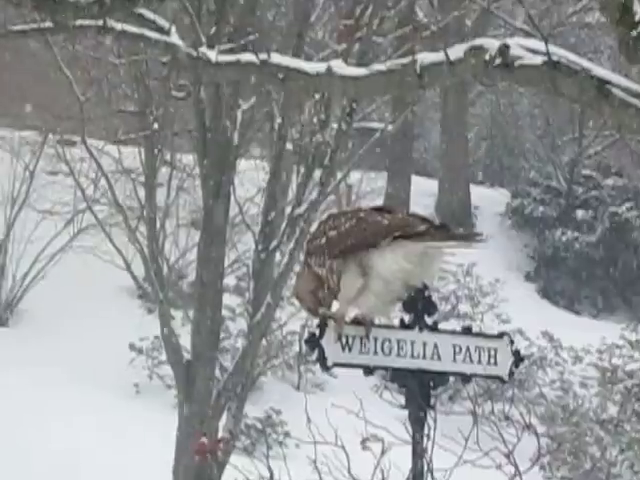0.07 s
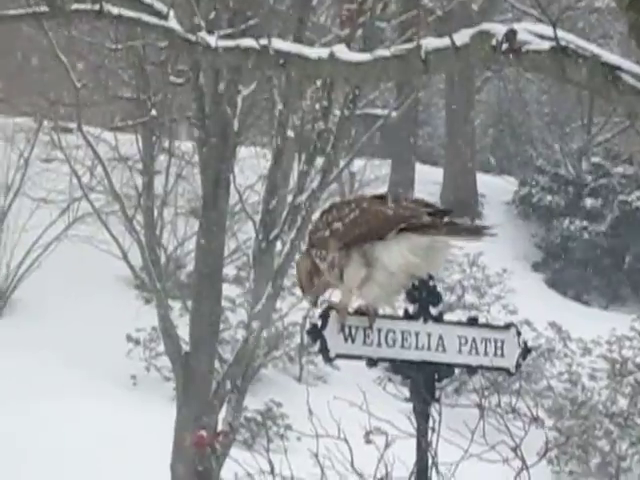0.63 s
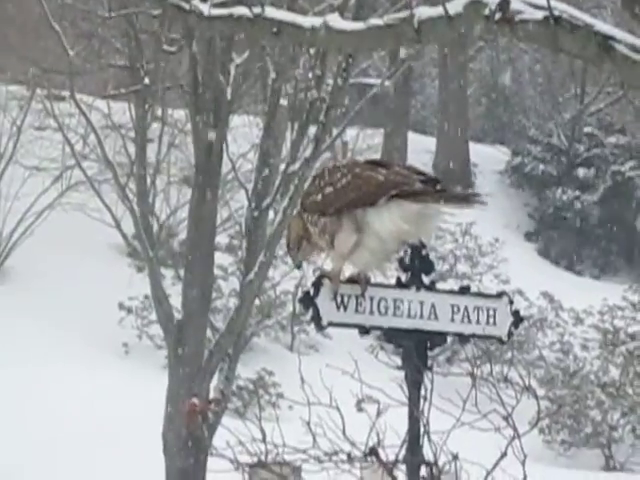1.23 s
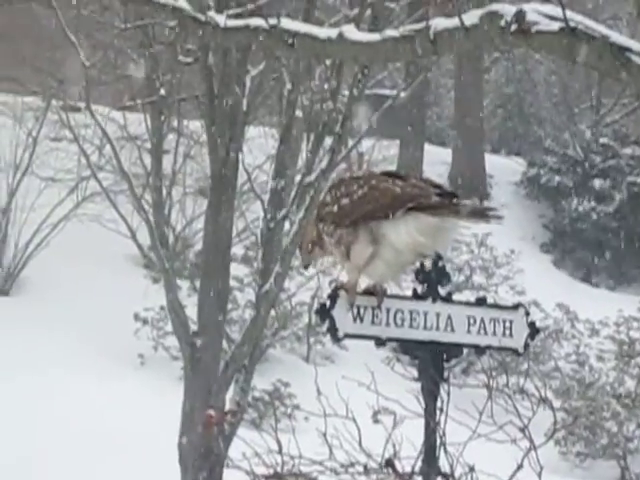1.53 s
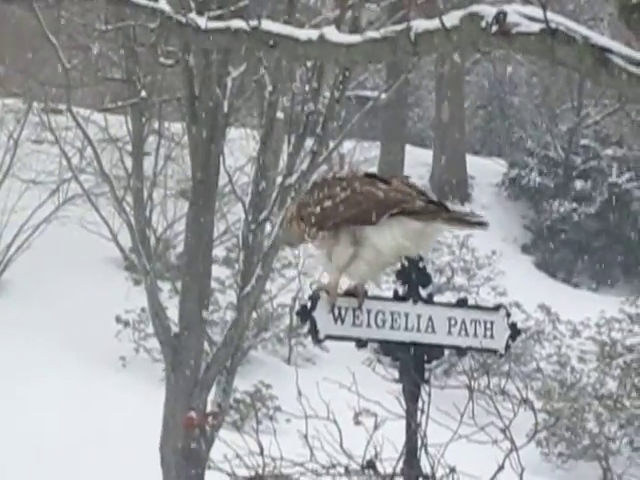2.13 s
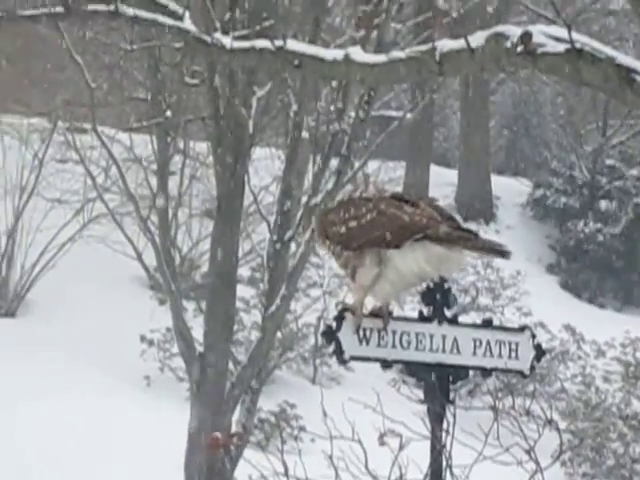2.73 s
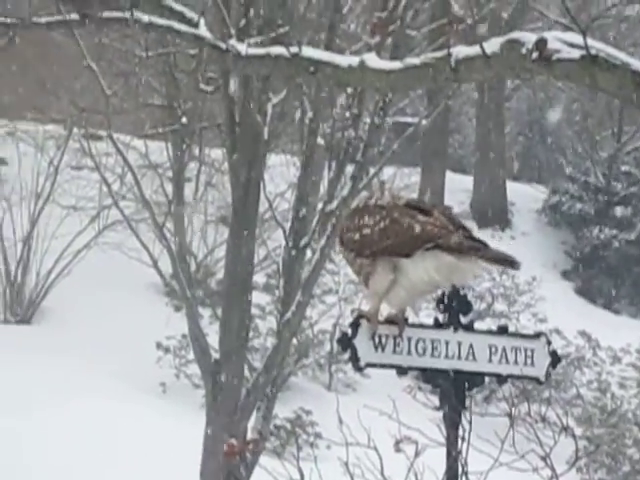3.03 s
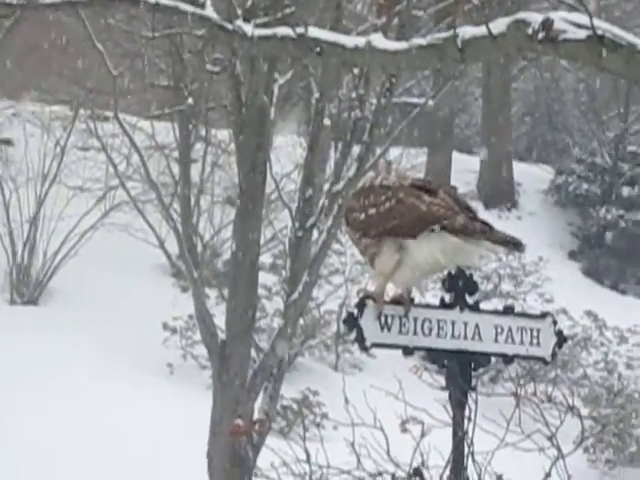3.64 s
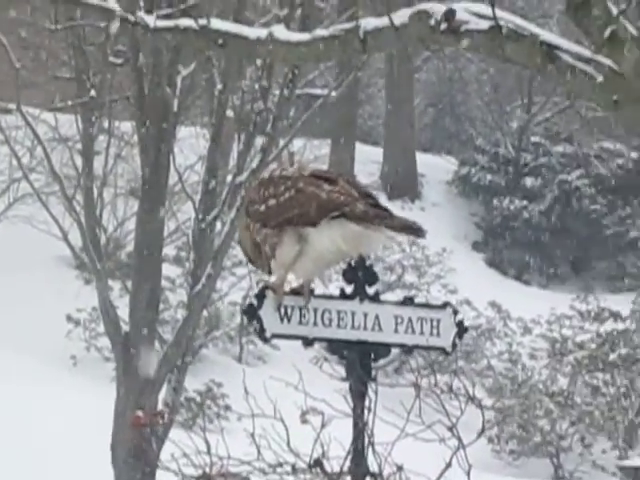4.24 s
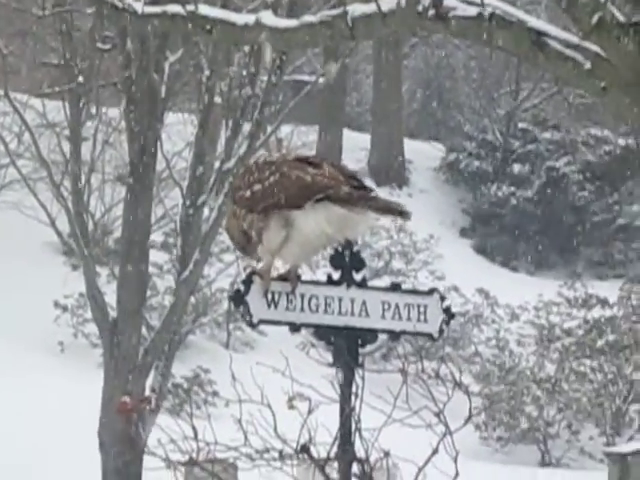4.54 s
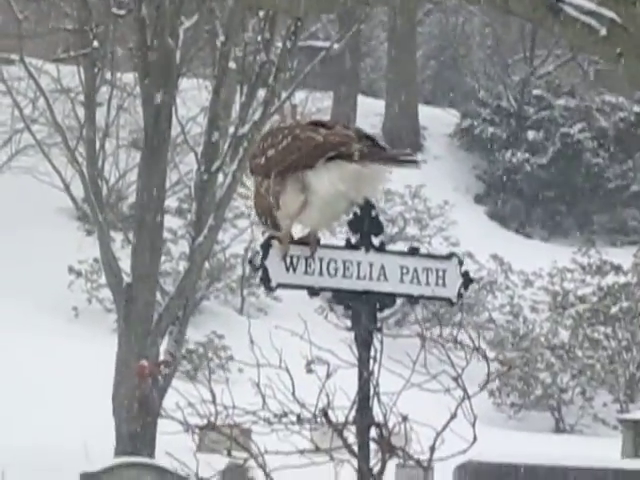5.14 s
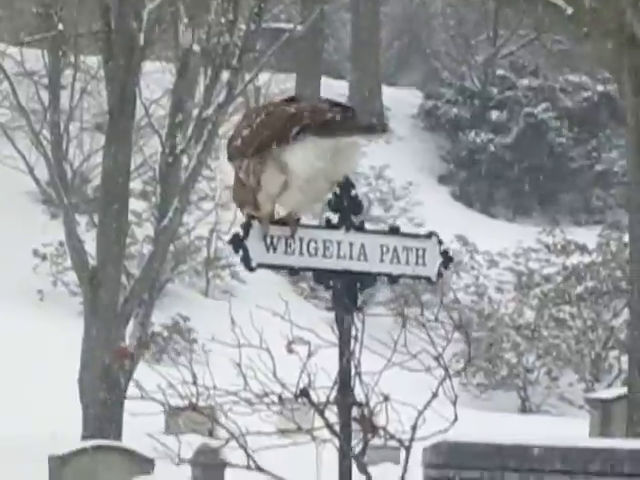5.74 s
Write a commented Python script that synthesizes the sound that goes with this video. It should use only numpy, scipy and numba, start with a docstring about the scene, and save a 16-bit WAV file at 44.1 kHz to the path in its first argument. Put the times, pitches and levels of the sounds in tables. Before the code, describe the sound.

Five loud, hoarse screams from a nearby jay in a snowy wood, with faint whistles, clicks and a low background rumble.

```python
"""A jay screams five times, close by in a snowy wood. Each scream starts clear, then breaks into a rasp
as the two sides of its voice organ (the syrinx) fall out of step. A small bird whistles far off, and a
few clicks, chinks and rustles sound nearby, over distant traffic, a low rumble and an engine's hum.
An automatic volume control turns everything down under each scream."""
import sys
import numpy as np
from scipy import signal
from scipy.fft import rfft, irfft
from scipy.io import wavfile
from scipy.ndimage import uniform_filter1d, minimum_filter1d
from numba import njit

SR = 44100
rng = np.random.default_rng(int(sys.argv[2]) if len(sys.argv) > 2 else 0)


def generate_wav(sig):
    """Save sig (samples, or channels by samples) to the path in sys.argv[1] as 16-bit PCM at SR."""
    pcm = np.round(np.clip(np.atleast_2d(sig).T, -1, 1) * 32767).astype(np.int16)
    wavfile.write(sys.argv[1], SR, pcm)


N = 263277
T = np.arange(N) / SR
DROOP_S = 0.04  # how quickly a scream gives way at its end


def undb(db):
    """Turn decibels into a gain."""
    return 10 ** (np.asarray(db) / 20)


def unit(x):
    """Scale a signal to an average power of 1."""
    return x / np.sqrt(np.mean(x ** 2))


def phase_of(hz):
    """Add up a changing pitch into the angle of a wave."""
    return 2 * np.pi * np.cumsum(hz) / SR


def curves(rows, t):
    """Join a table's rows by straight lines; the first column is time."""
    times, *columns = np.transpose(rows)
    return [np.interp(t, times, column) for column in columns]


def colour_db(points, hz):
    """Read a colour, a list of (frequency [Hz], level [dB]), at the given frequencies."""
    knots, db = np.transpose(points)
    return np.interp(np.log(hz), np.log(knots), db)


def wander(rate_hz, size=N):
    """Smooth random motion of typical size 1, up to about rate_hz."""
    hz = np.fft.rfftfreq(size, 1 / SR)
    return unit(irfft(rfft(rng.standard_normal(size)) / (1 + (hz / rate_hz) ** 4), size))


def coloured(points, size=N):
    """Noise of power 1 with the given colour."""
    gain = undb(colour_db(points, np.fft.rfftfreq(size, 1 / SR) + 1))
    return unit(irfft(rfft(rng.standard_normal(size)) * gain, size))


def resonate(x, hz, width_hz):
    """Let through a band of sound around hz."""
    return signal.lfilter(*signal.iirpeak(hz, hz / width_hz, fs=SR), x)


def traffic(level_db=-42.5):
    """Distant traffic: a dull, almost steady wash of noise."""
    # colour of the traffic, inner rows only are used: (frequency [Hz], level [dB])
    colour = [(20, -15), (50, 3), (75, -4), (150, -1), (300, -1.5), (550, -3), (900, 2), (1400, -3.5),
              (2600, -7.5), (4400, -13), (5500, -21.5), (6800, -29.5), (9000, -35.5), (14000, -75)]
    return coloured([(3.9, -12)] + list(colour[1:-1])) * undb(level_db + .5 * wander(0.9))


def rumble():
    """Deep noise around 35 Hz that slowly sinks and rises."""
    # strength of the rumble: (time [s], level [dB])
    levels = [(0, -52), (3, -57.5), (3.9, -51), (5.97, -57.5)]
    level_db, = curves(levels, T)
    colour = [(10, -19), (24, -10.5), (35, 9.5), (48, -12.5), (90, -36.0), (400, -90.5)]
    return coloured(colour) * undb(level_db)


def engine_hum(drift=0.003985, flutter_db=3):
    """An engine hums three low tones that drift in pitch together."""
    # tones of the hum: (frequency [Hz], level before the swell [dB])
    tones = [(157, -58.5), (313, -61), (469, -61)]
    # its slow swell: (time [s], gain [dB])
    swell = [(0, -7), (2.7, -3), (4.6, 3.5), (5.97, -4)]
    swell_db, = curves(swell, T)
    phase_per_hz = phase_of(1 + drift * wander(2.1))
    hum = sum(undb(db + flutter_db * wander(3.0)) * np.sin(hz * phase_per_hz) for hz, db in tones)
    return np.sqrt(2) * hum * undb(swell_db)


def woods(x, branches_s=.3, trunks_s=0.82, slope_delay_s=0.53, slope_db=-13):
    """Close branches echo briefly and brightly, trunks longer and duller, and a far slope once more."""
    t = T[:SR]
    branches = coloured([(1500, -12.5), (3300, 0), (7000, 8), (9000, 2), (13000, -19)], SR)
    branches *= undb(-60 * t / branches_s) * np.clip(t / .012, 0, 1)
    trunks = undb(-60 * t / trunks_s + wander(60, SR)) * np.clip(t / 0.098, 0, 1)
    trunks *= coloured([(1000, -31), (2500, -0.5), (3300, -1), (6500, -7), (8500, -12),
                        (12000, -43.5)], SR)
    slope = coloured([(1000, 12), (3300, 0.5), (5000, -29.0), (8000, -37)], SR)
    slope *= np.exp(-((t - slope_delay_s) / 0.025) ** 2)
    echoes = unit(branches) + unit(trunks) + undb(slope_db) * unit(slope)
    return signal.fftconvolve(x, echoes / np.sqrt(SR))[:N]


def far_bird(count=6, first_s=.084, every_s=.1162, gain_db=-28.5):
    """A small bird whistles a quick, even run of pure upward slides."""
    # one whistle: (time from its top [s], pitch [Hz], relative level [dB])
    slide = [(-.055, 1690, -16.5), (-.035, 1950, -21), (-.02, 2270, -12), (-.01, 2950, -9), (0, 3040, -7),
             (.009, 3000, -18), (0.02, 2800, -16)]
    out = np.zeros(N)
    for top in first_s + every_s * np.arange(count):
        during = (T > top + slide[0][0]) & (T < top + slide[-1][0])
        hz, shape_db = curves(slide, T[during] - top)
        out[during] += np.sqrt(2) * undb(gain_db + shape_db) * np.sin(phase_of(hz))
    return out


def rustles():
    """Soft rustles: short swells of grainy noise."""
    # (middle time [s], spread in time [s], level [dB], centre frequency [Hz])
    swells = [(0.354, 0.055, -43, 2770), (2.379, 0.013, -41, 2190)]
    out = np.zeros(N)
    for middle, spread, db, hz in swells:
        grains = rng.standard_normal(N) * undb(1.2 * wander(300))
        rustle = unit(resonate(resonate(grains, hz, hz * .5), hz, hz * 0.91))
        out += undb(db) * np.exp(-((T - middle) / spread) ** 2 / 2) * rustle
    return out


def chinks(fade_s=0.014, spread_octaves=0.83, size=4096):
    """Small metallic chinks: each contact rings briefly with several wavering tones."""
    # contacts: (time [s], level [dB], brightest frequency [Hz])
    contacts = [(2.066, -29.5, 4300), (2.09, -34, 4600), (2.109, -35.5, 4500), (2.519, -30.5, 4320),
                (2.534, -32, 4560), (2.557, -39, 4770), (2.584, -38, 4900), (3.941, -36, 4900)]
    # the tones they ring with: (frequency [Hz], waver [Hz], relative level [dB])
    tones = [(1957, 23, 9.5), (3490, 120, -4.5), (3730, 20, -8.5), (4420, 160, -8.5), (4675, 100, -1),
             (5290, 85, -9)]
    envelope = np.exp(-T[:size] / fade_s) * np.clip(T[:size] / 0.00039, 0, 1)
    out = np.zeros(N)
    for start, db, brightest_hz in contacts:
        ring = np.zeros(size)
        for hz, waver_hz, tone_db in tones:
            gain = undb(tone_db) * np.exp(-(np.log2(hz / brightest_hz) / spread_octaves) ** 2)
            ring += gain * np.sin(phase_of(hz + waver_hz * wander(390, size)) + rng.uniform(0, 2 * np.pi))
        out[int(start * SR):][:size] += undb(db) * envelope * unit(ring)
    return out


def clicks(fade_s=0.00087, width_share=0.46, top_hz=9500, size=4096):
    """Dry clicks: one sharp snap each, with a little splintering after it."""
    # snaps: (time [s], peak level [dB], centre frequency [Hz])
    snaps = [(.151, -36, 6500), (0.323, -16, 1792), (0.3313, -22, 1840), (0.3864, -20.5, 4500),
             (.575, -23.5, 4360), (2.256, -24, 4070), (2.454, -36, 6500), (4.139, -21.5, 4600)]
    out = np.zeros(N)
    for start, db, hz in snaps:
        snap = signal.unit_impulse(size) + np.exp(-T[:size] / fade_s) * rng.standard_normal(size) / 2
        width_hz = width_share * hz
        click = resonate(resonate(snap, hz, width_hz), hz, 1.6 * width_hz)
        click = signal.sosfilt(signal.butter(2, top_hz, fs=SR, output="sos"), click)
        out[int(start * SR):][:size] += undb(db) * click / np.abs(click).max()
    return out


def scream_pitch(t, start, slip, split, end, top_hz, sag_hz_per_s, lift_hz, slip_hz=59.06, droop=.068):
    """The pitch sags, slips a step, can lift with a fresh push, and droops as the air runs out."""
    held = top_hz - sag_hz_per_s * (t - start) - slip_hz * (1 + np.tanh((t - slip) / 0.015)) / 2
    lift = lift_hz * np.exp(-((t - split - 0.0268) / 0.0394) ** 2)
    return (held + lift) * (1 - droop * np.exp(np.minimum(t - end, 0) / DROOP_S))


def scream_levels(age, left, main_db, overtones_db, opens_s=0.02, closes_s=0.081, shut_db=21.5):
    """Relative levels of the tones at 2, 3 and 4 times the pitch; a shut bill muffles the last."""
    # the main tone surges as the voices lock, at the third's cost, then slowly weakens
    surge = np.exp(-((age - 0.039) / 0.01) ** 2)
    second_db = -19.5 + main_db + 6.5 * surge - 3 * age
    third_db = -32.5 - 7 * surge
    bill_open = (1 - np.exp(-age / opens_s)) * (1 - np.exp(-left / closes_s))
    fourth_db = -27 + overtones_db - shut_db * (1 - bill_open)
    return second_db, third_db, fourth_db


def scream(start, slip, split, end, top_hz, sag_hz_per_s, lift_hz, scoop_s, main_db, overtones_db,
           partner_gain_db, squeak_hz, squeak_db, side_tones, free_hz=2533, rasp_db=-34.7, fade_s=.04):
    """A voice and its partner lock at 2:3; then the partner holds its own pitch and they beat harshly."""
    # colour given by the throat and bill: (frequency [Hz], level [dB])
    throat = [(1200, -56), (1900, -15.5), (2400, -1), (3300, 3), (4200, 1), (5200, -6.5), (5900, -1.5),
              (6700, 5), (7600, -10.5), (8700, -15.5), (10000, -36), (13000, -42.5)]
    # tones the voices make together: (multiple of voice, of partner, in step [dB], out of step [dB])
    mixtures = [(0, 1, -2, -0.5), (1, 1, 2.5, -0.5), (2, 1, -8, -1), (3, 1, -16.5, -18), (4, 1, -29, -29.5),
                (-1, 2, -49.5, 1), (1, 2, -48.5, -30.5), (-1, 3, -43, -43), (4, -1, -36.5, -6.5)]
    # brief cracks in the clear part: (time [s], half length [s], strength [0-1])
    voice_cracks = [(1.568, 0.0047, 0.4), (2.721, 0.045, 0.36), (5.67, 0.0045, 0.3)]
    t = T[(T >= start) & (T < end + fade_s)]
    size, age = len(t), t - start
    free = np.clip((t - split) / 0.0049, 0, 1)  # 0 in step, 1 out of step
    opening = np.exp(-(age / .02) ** 2)
    cracks = sum(amount * np.exp(-((t - at) / length) ** 2) for at, length, amount in voice_cracks)
    rough = free * np.interp(t, [split, end], [.75, 1.15]) + opening + 2 * cracks

    def tone(phase, db, flutter_db=2):
        """One tone whose strength flutters, the more so when rough."""
        wave = np.sqrt(2) * np.sin(phase + rng.uniform(0, 2 * np.pi))
        gain = undb(db + flutter_db * wander(62, size))
        return wave * gain * (1 + .18 * (rough + .2) * wander(180, size))

    # the pitch scoops up as pressure builds, and trembles with the roughness
    hz = scream_pitch(t, start, slip, split, end, top_hz, sag_hz_per_s, lift_hz)
    hz *= 1 - 0.235 * np.exp(-age / scoop_s)
    hz *= 1 + .003 * wander(14, size) + .0035 * wander(45, size) + .008 * rough * wander(400, size)
    partner_hz = 3 / 2 * hz * (1 - free) + free * free_hz * (1 + .008 * wander(350, size))
    voice, partner = phase_of(hz), phase_of(partner_hz)
    # out of step, the partner tugs at the voice once a beat
    beat = 2 * partner - 3 * voice
    voice += .18 * free * rough * np.sin(beat)
    # the start is bright; the third tone and the partner swell and sink by chance
    second_db, third_db, fourth_db = scream_levels(age, end - t, main_db, overtones_db)
    fourth_db += 11 * opening
    third_db += 4 * wander(25.5, size)
    partner_db = -37 + partner_gain_db - 18 * opening + 2 * wander(4.8, size)
    sound = tone(voice, -46) + tone(2 * voice, second_db - 2 * rough, flutter_db=1.5)
    sound += tone(3 * voice, third_db)
    # the high tones flare as the scoop carries them through the throat's top resonance
    for k in range(4, 8):
        throat_db = colour_db(throat, k * hz) - colour_db(throat, 4 * hz.mean())
        sound += tone(k * voice, fourth_db + throat_db - 2 * rough - 2 * (k - 4))
    for m, n, locked_db, loose_db in mixtures:
        mixture_db = partner_db + locked_db * (1 - free) + (loose_db + 1.5) * free
        sound += tone(round(m) * voice + round(n) * partner, mixture_db)
    # the beat shakes the level; while clear, the wave's period stretches to four cycles at times, adding faint
    # side tones a quarter of the pitch away
    shake = .3 * free * np.minimum(rough, 1) * np.cos(beat + np.pi / 4)
    quartering = side_tones * (1 - free) * wander(17, size) * np.cos(voice / 4)
    sound *= 1 + shake + quartering
    # the tones tear unevenly in the rasp, then collapse into it
    sound *= undb(0.5 * free * wander(25, size) - 3 * np.exp((t - end) / DROOP_S))
    # wild flapping bursts with the beat, grows as pressure runs out and tapers as the bill shuts
    bursts = (1 + .75 * free * np.cos(beat)) * undb(-3 * np.exp((t - end) / fade_s))
    noise_gain = undb(rasp_db) * rough * bursts + undb(-30) * (cracks + opening) + undb(-51)
    sound += coloured(throat, size) * noise_gain
    # a brief high squeak near 5 kHz opens each scream
    squeak = tone(phase_of(squeak_hz * (1 + 0.064 * wander(230, size))), squeak_db)
    sound += np.exp(-(age / 0.028) ** 2) * squeak
    fade_in = np.clip(age / 0.00098, 0, 1) * (1 - 0.82 * np.exp(-age / 0.036))
    fade_out = (1 - np.tanh((t - end) / .011)) / 2
    out = np.zeros(N)
    out[np.searchsorted(T, start):][:size] = sound * fade_in * fade_out
    return out


def scolding_jay(gain_db=9.5):
    """The jay pushes air through its voice organ in five screams."""
    # screams: (start [s], pitch slip [s], split into rasp [s], end [s], pitch [Hz], sag [Hz/s],
    # lift after the split [Hz], scoop time [s], main tone gain [dB], overtone gain [dB],
    # partner gain [dB], squeak pitch [Hz], relative squeak level [dB], side tones [0-1])
    screams = [(0.683, .848, .885, 1.043, 1792, 415, 0, .0138, 0, -1, 1.5, 4840, -20, .03),
               (1.359, 1.495, 1.598, 1.717, 1740, 130, 28, .021, 1, -3.5, 0, 4330, -23, .02),
               (2.716, 2.843, 2.905, 3.053, 1722, 90, 0, .0136, -2, 1.5, -2, 4820, -23, .14),
               (4.205, 4.304, 4.376, 4.557, 1731, 165, 0, .0142, -.5, -1.5, 1.5, 5070, -19, .07),
               (5.599, 5.703, 5.812, 5.995, 1760, 290, 35, .0115, .5, 1, -1.5, 5220, -19, .07)]
    return undb(gain_db) * sum(scream(*row) for row in screams)


def scene(echo_db=-28, side_db=-52, lead_samples=0.24, far_echo_db=12):
    """Mix left and right: the jay sits a little to the right, and the far bird has more echo."""
    jay = scolding_jay()
    whistles = far_bird()
    near = jay + clicks() + chinks() + rustles()
    echo = undb(echo_db) * woods(near + undb(far_echo_db) * whistles)
    mid = near + whistles + echo + traffic() + rumble() + engine_hum()
    # the echo has a little width, and the jay reaches the right side just ahead of the left
    side = undb(side_db) * woods(near) - lead_samples / 2 * np.gradient(jay)
    return np.array([mid + side, mid - side])


@njit
def follow(x, attack, release, level):
    """Track x from a starting level, rising at the attack rate and falling at the release rate."""
    out = np.empty(len(x))
    for i in range(len(x)):
        level += (x[i] - level) * (attack if x[i] > level else release)
        out[i] = level
    return out


def record(dry, threshold_db=-24, duck_db=9, start_cut_db=16.5, attack_s=0.009, release_s=0.22,
           ceiling=.275, hiss_db=-65.5, top_hz=15800):
    """The volume starts low and dips under loud sounds; then come a peak limit, hiss and a treble cut."""
    loud_db = 10 * np.log10(uniform_filter1d(dry[0] ** 2, size=128) + 1e-12)
    excess_db = np.clip(loud_db - threshold_db, 0, duck_db)
    cut_db = follow(excess_db, 1 / (attack_s * SR), 1 / (release_s * SR), start_cut_db)
    out = dry * undb(-cut_db)
    allowed_gain = ceiling / np.maximum(np.abs(out[0]), ceiling)
    out *= uniform_filter1d(minimum_filter1d(allowed_gain, size=128), size=128)
    out += undb(hiss_db) * rng.standard_normal((2, N))
    return signal.sosfilt(signal.ellip(10, .2, 70, top_hz, fs=SR, output="sos"), out)


dry = scene()
out = record(dry)
generate_wav(out)
```